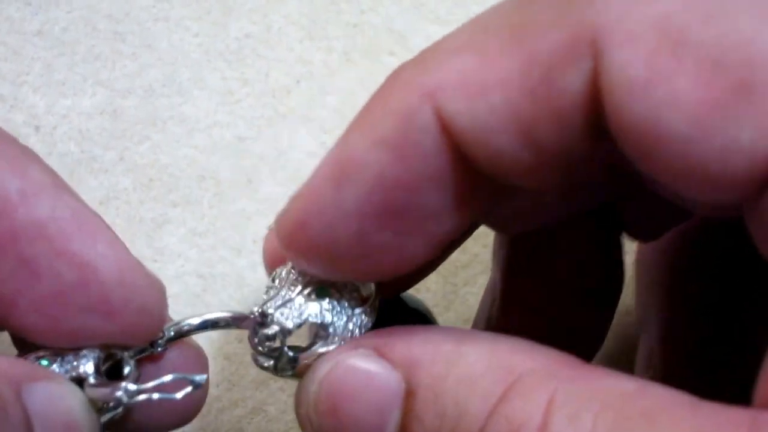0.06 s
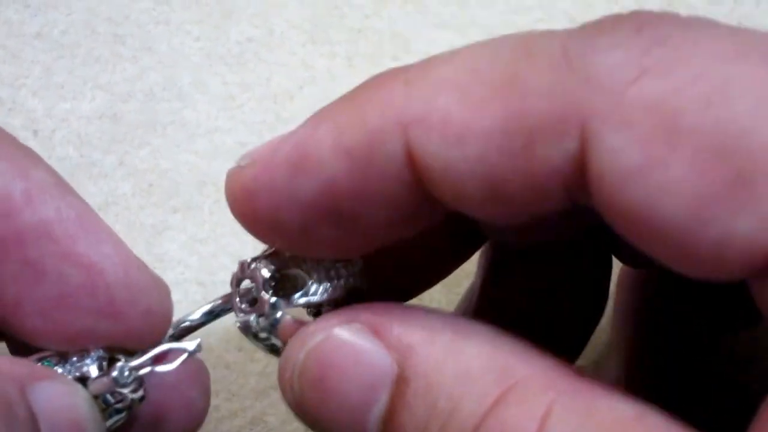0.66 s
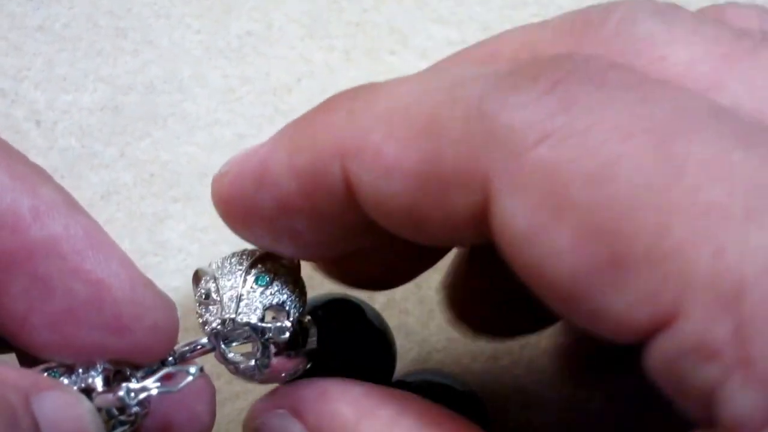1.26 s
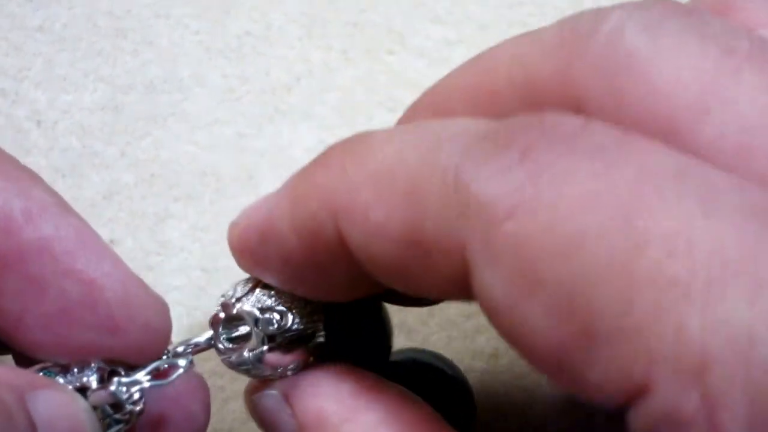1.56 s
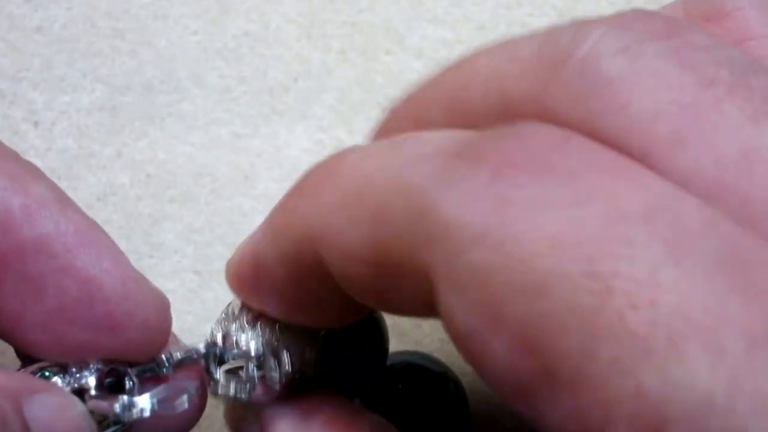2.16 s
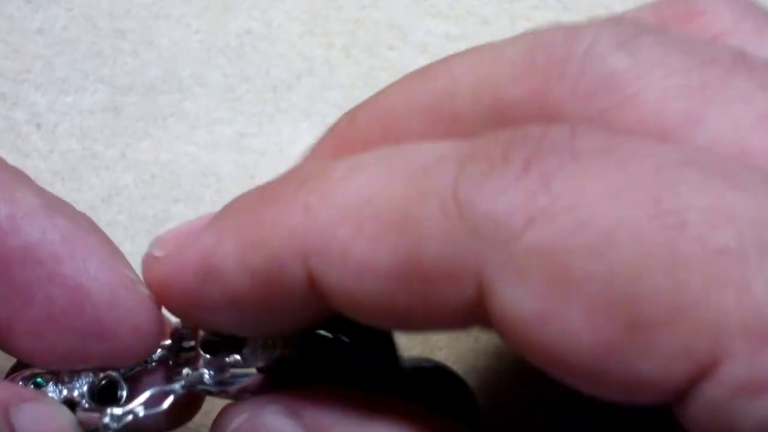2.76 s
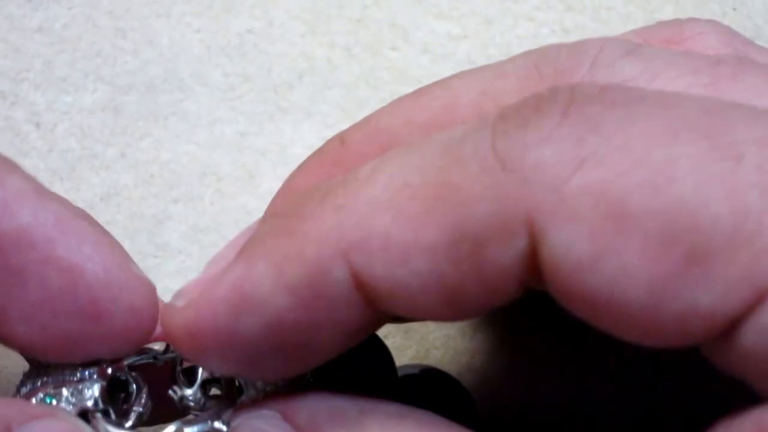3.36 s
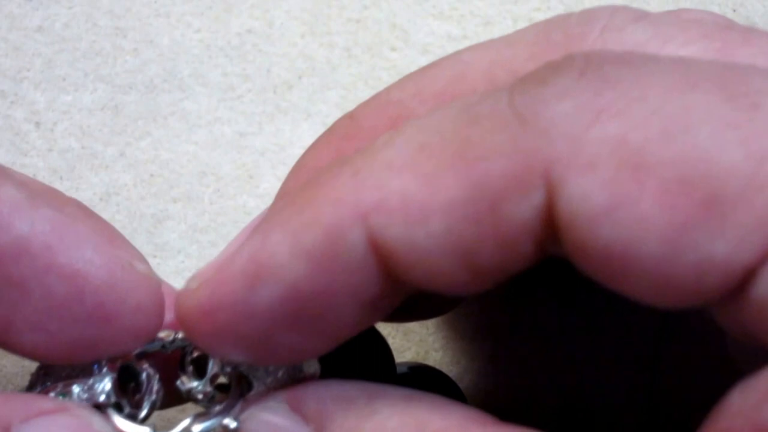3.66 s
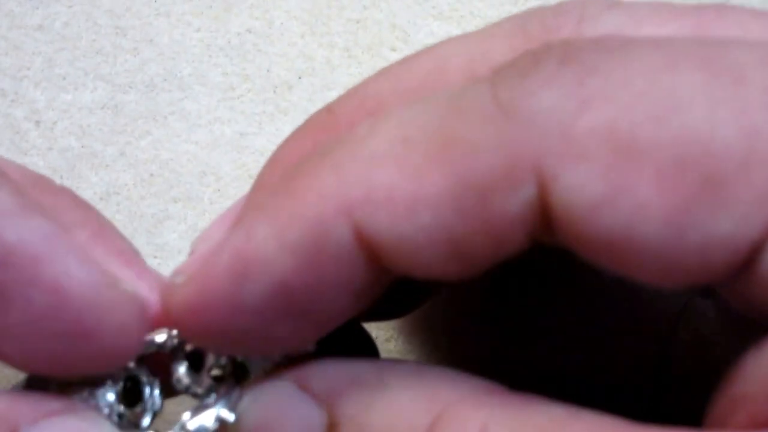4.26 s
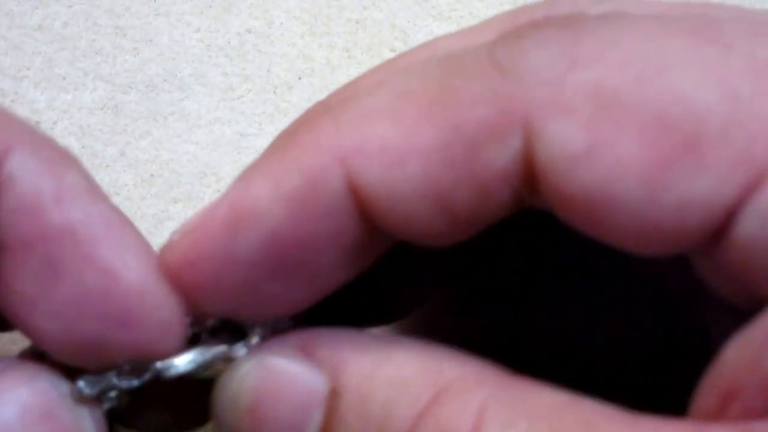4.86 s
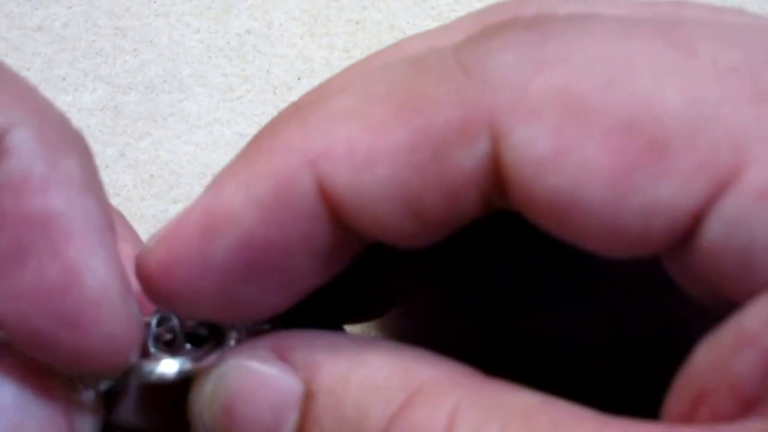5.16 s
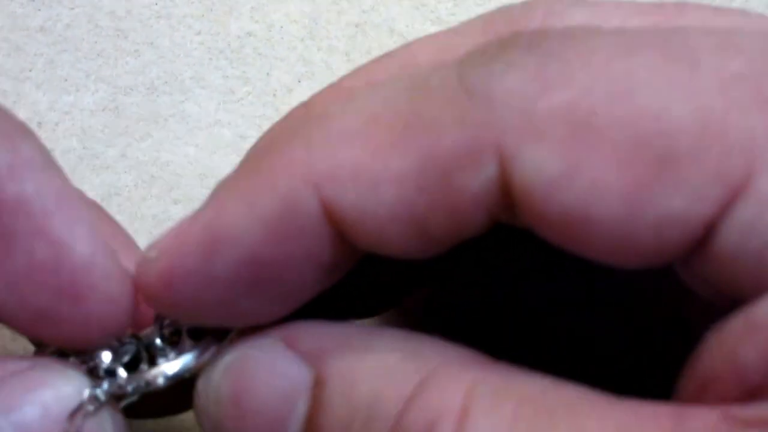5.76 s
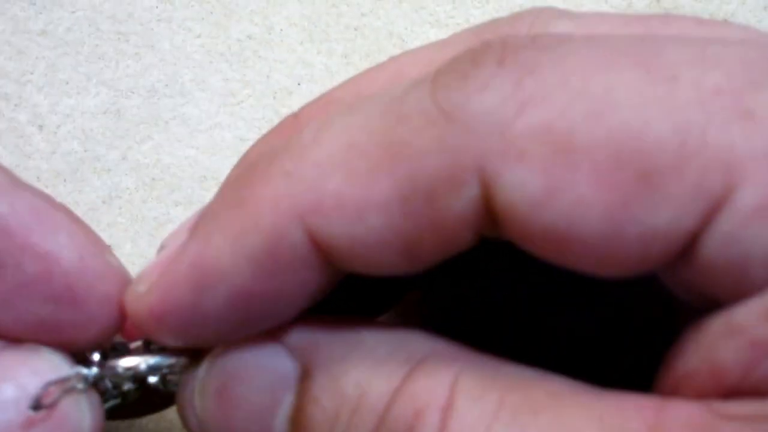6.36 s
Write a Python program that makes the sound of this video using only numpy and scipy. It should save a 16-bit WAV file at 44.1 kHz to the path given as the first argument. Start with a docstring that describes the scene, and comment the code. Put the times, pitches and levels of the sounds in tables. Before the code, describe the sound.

Close, thin metallic ticks from a bead string's clasp being handled, with one sharp snap and quiet room hum behind.

```python
"""A small metal clasp on a string of beads ticks as fingers work it, close to a microphone.
Clasp, ring and links tap each other and ring briefly, and the spring catch snaps shut once.
Fingertips rub, metal scrapes and beads knock softly. Behind them are a quiet, droning room and
faint electrical whines. The loud snap makes an automatic gain control turn everything down briefly."""
import sys
import numpy as np
from scipy import signal
from scipy.fft import rfft, irfft
from scipy.io import wavfile
from scipy.ndimage import uniform_filter1d

SR = 44100
rng = np.random.default_rng(int(sys.argv[2]) if len(sys.argv) > 2 else 0)


def to_wav(s):
    """Save 16-bit WAV."""
    ch = np.atleast_2d(s).T  # columns
    pcm = np.round(np.clip(ch, -1, 1) * 32767)  # PCM
    wavfile.write(sys.argv[1], SR, pcm.astype(np.int16))


N = 282240
TAPS = 2048  # samples used to build one short sound
HZ = np.fft.rfftfreq(TAPS, 1 / SR)  # the frequencies in its spectrum


def ticks(touches=3):
    """Metal parts tap each other once, or land and bounce, weaker with each touch."""
    # single taps: start_s, level_db, ring_hz, second_ring_hz, body_db, brightness_db
    single_taps = [(0.6064, -23.5, 10200, 13000, 6, -12), (0.8072, -37, 9400, 12500, 0, -9),
                   (0.8909, -13, 9650, 10200, -29, 1), (0.9371, -29, 9600, 10800, -4, -10),
                   (0.9418, -18.5, 9850, 11200, -6, -13), (0.9635, -34, 10070, 11400, 5, -4),
                   (1.1454, -20, 9900, 11900, 3, -7), (1.2404, -28, 9700, 12200, 9, -9),
                   (1.2426, -23, 9800, 9100, 7, -11), (1.4446, -17, 8750, 10500, -5, 3),
                   (1.5775, -28.5, 8400, 9200, -7, -9), (2.1099, -31, 8680, 9600, -17, -12),
                   (2.2403, -37, 8300, 13300, 0, -4), (2.268, -24, 8100, 13100, 0, -8),
                   (2.497, -22, 8300, 9000, 5, -15), (2.5062, -27, 8200, 8700, -5, -12),
                   (2.594, -30.5, 8830, 10800, 2, -12), (2.7593, -23, 8900, 6300, 9, -12),
                   (2.7662, -30, 6400, 8600, 9, -18), (2.783, -28.5, 8060, 8600, 6, -4),
                   (3.362, -33.5, 8700, 10800, 15, -12), (3.4087, -36.5, 10200, 11200, -16, -14),
                   (4.418, -36, 8300, 10800, 1, -5), (4.5585, -35, 8000, 9300, 6, -11),
                   (4.8494, -33, 7300, 9900, 1, -12), (4.8727, -25, 12250, 7700, 3, -7),
                   (4.897, -22.5, 7550, 11300, -1, -11), (4.955, -23, 11250, 7800, 3, -7),
                   (4.9564, -17, 11250, 7750, 3, -8), (4.9593, -16, 11300, 7700, 3, -8),
                   (4.962, -25, 11250, 7800, 3, -8), (4.9795, -33, 11300, 7800, 7, -8),
                   (5.0208, -33, 7900, 9200, 0, -10), (5.0337, -37, 8200, 10300, 4, -4),
                   (5.061, -6.5, 7600, 8700, -3.5, -3), (5.21, -28, 8370, 14800, 6, -4),
                   (5.2184, -31, 8100, 12800, 2, -10), (5.2341, -37, 8100, 11200, 1, -8),
                   (5.269, -35.5, 8200, 11200, 1, -8), (5.9315, -17, 8300, 7400, 3, -15)]
    # bouncing links: the same six columns, then gap_s, loss_per_bounce_db
    bounces = [(0.0315, -27.5, 9600, 8300, 0, -6, .0029, 7.5), (2.2091, -26, 8250, 9900, 1, -11, .0033, 1),
               (2.4957, -16.5, 8300, 11600, 5, -15, 0.0048, 6.5),
               (4.93, -20, 7750, 11000, 1, -1, .0054, 5.5)]
    out = np.zeros(N)
    for row in single_taps:
        add(out, *contact(*row))
    for start_s, db, *part, gap_s, loss_db in bounces:
        for k in range(touches):
            add(out, *contact(start_s + k * gap_s, db - k * loss_db, *part))
    return out


def contact(start_s, db, ring_hz, second_hz, body_db, brightness_db, graze_s=0.00075, ripple_db=3.0):
    """One touch makes a metal part ring; returns its start time and its sound."""
    bands_hz = np.linspace(0, SR / 2, 30)
    # the spot that is hit favours some pitches over others
    ripple = ripple_db * np.interp(HZ, bands_hz, rng.standard_normal(len(bands_hz)))
    colour_db = metal_spectrum(ring_hz, second_hz, body_db, brightness_db) + ripple
    # a grazing touch smears the blow: each band is a fraction of a millisecond late
    lag_s = graze_s * np.interp(HZ, bands_hz, rng.random(len(bands_hz)))
    smear = np.exp(-2j * np.pi * np.cumsum(lag_s) * SR / TAPS)
    sound = irfft(rfft(struck(db + colour_db)) * smear)
    return start_s - graze_s / 2, sound[:TAPS // 2]


def metal_spectrum(ring_hz, second_hz, body_db, brightness_db):
    """The tone of one small metal part, in dB: two ringing pitches stand out from the rest."""
    # tone shared by all the small parts: pitch_hz, level_db
    metal = [(200, -36), (1000, -21), (3500, -20.5), (4900, -14.5), (5900, -13), (6500, -5), (7100, -3.5),
             (7700, -3), (10500, -1), (13000, 4.5), (15600, -1), (17000, -5)]
    lows_db = body_db * read([(5800, 1), (7600, 0.21)], HZ)
    highs_db = brightness_db * read([(10500, 0), (13000, 0.76)], HZ)
    ring_db = 12 - 0.44 * body_db  # a part held against the fingers has more body and rings less
    ring = resonance(HZ, ring_hz, half_width_hz=510, db=ring_db)
    second = resonance(HZ, second_hz, half_width_hz=440, db=8)
    return read(metal, HZ) + lows_db + highs_db + 10 * np.log10(1 + ring ** 2 + second ** 2)


def snap(start_s=1.8803, boost_db=9):
    """The spring catch drops shut in one hard blow that rings the whole clasp."""
    # tone of the clasp's body: pitch_hz, level_db
    clasp = [(300, -37), (1000, -29), (1500, -14.5), (2100, -22), (2600, -24), (3200, -32), (3800, -24),
             (4400, -17.5), (5400, -10), (6450, -2), (7100, -5.5), (7700, -1.5), (9000, 0.5), (10500, -11),
             (11800, -3), (13200, -4), (15500, -7), (17000, -5)]
    out = np.zeros(N)
    add(out, start_s, struck(boost_db + read(clasp, HZ)))
    return out


def struck(spectrum_db):
    """The ring of an object with this spectrum after one sharp blow."""
    log_gain = np.log(amp(np.r_[spectrum_db, spectrum_db[-2:0:-1]]))
    spectrum = np.exp(np.conj(signal.hilbert(log_gain)))  # minimum phase: no sound before the blow
    return irfft(spectrum[:len(spectrum_db)])


def knocks(attack_s=0.00023):
    """A nudged bead gives one lower ring that the fingers stop at once."""
    # bead knocks: start_s, level_db, pitch_hz, fade_s (time to fall by 60 dB)
    beads = [(0.695, -42, 3000, .004), (2.2505, -38, 2700, 0.0067), (2.256, -48, 4320, .005),
             (2.4956, -39, 2880, .004), (2.497, -40, 4600, .005), (5.0616, -41, 2800, 0.0018),
             (5.0614, -43, 4750, 0.0018)]
    out, t = np.zeros(N), np.arange(TAPS * 2) / SR
    for start_s, db, hz, fade_s in beads:
        envelope = (1 - np.exp(-t / attack_s)) * np.exp(-np.log(1000) * t / fade_s)
        add(out, start_s, amp(db) * envelope * np.sin(2 * np.pi * hz * t))
    return out


def rubs():
    """Sliding skin makes a soft hiss; metal dragged over metal rings as it goes."""
    # fingertips on beads: middle_s, half_length_s, level_db, centre_hz, width_octaves
    slides = [(0.5, .011, -54, 1180, .3), (0.942, .03, -62, 5500, 0.93), (2.255, 0.012, -59.5, 3100, 0.73),
              (2.555, .03, -63, 4300, 1), (2.919, 0.084, -68, 5960, .83), (3.956, 0.036, -64, 5500, 0.85),
              (4.68, .043, -58.5, 13000, 0.18), (4.957, 0.023, -58.5, 6500, 1)]
    # metal on metal: middle_s, half_length_s, level_db, ring_hz, second_ring_hz, body_db
    scrapes = [(0.043, .03, -68, 9200, 11000, 16), (0.933, 0.021, -73, 9900, 11200, -4),
               (1.565, .055, -69, 9000, 11500, 20), (2.64, .026, -66, 11000, 13000, 14),
               (4.681, 0.055, -61.5, 9300, 13500, 14), (4.951, 0.0072, -53, 11300, 7800, 2),
               (5.0595, 0.001, -39, 11400, 7900, 2)]
    out = np.zeros(N)
    for middle_s, half_s, db, centre_hz, octaves in slides:
        band = np.exp(-(np.log2((HZ + 1) / centre_hz) / octaves) ** 2 / 2)
        add(out, *friction(middle_s, half_s, db, band))
    for middle_s, half_s, db, *part in scrapes:
        colour = amp(metal_spectrum(*part, brightness_db=-19))
        add(out, *friction(middle_s, half_s, db, colour))
    return out


def friction(middle_s, half_s, db, colour, grain_db=2):
    """A dense run of tiny, uneven slips swells and fades; returns its start time and its sound."""
    size = SR // 2
    t, hz = (np.arange(size) - size // 2) / SR, np.fft.rfftfreq(size, 1 / SR)
    slips = rng.standard_normal(size) * amp(grain_db * np.minimum(rng.exponential(size=size), 5))
    rub = irfft(rfft(slips) * np.interp(hz, HZ, colour), size)
    envelope = np.exp(-(t / half_s) ** 2 / 2)
    sound = amp(db) * rub / rub.std() * envelope
    return middle_s + t[0], sound[middle_s + t >= 0]


def stirring(touches_per_s=16, db=-39, pitch_spread=0.11):
    """The links touch faintly, at random, while they are handled."""
    # times when the links stir: start_s, end_s
    handling = [(0.74, 0.83), (4.78, 4.9)]
    out = np.zeros(N)
    for start_s, end_s in handling:
        length_s = end_s - start_s
        for when, pitch in rng.random((round(touches_per_s * length_s), 2)):
            touch_s = start_s + when * length_s
            ring_hz = 8150 * (1 + pitch_spread * (2 * pitch - 1))
            add(out, *contact(touch_s, db, ring_hz, second_hz=11000, body_db=3, brightness_db=-9))
    return out


def room(sound, tail_gain_db=-2.5, dull_hz=10500, build_s=0.009):
    """The room adds a few quick echoes and a short tail that differs between left and right."""
    # echoes from table top, hands and walls: delay_s, level_db, smear_s
    echoes = [(.0005, -9, .0005), (.0013, -11.5, 0.004), (.0078, -19, .002), (0.017, -21, .002)]
    # the room's fading tail: pitch_hz, fade_s (time to fall by 60 dB), level_db
    tail_bands = [(500, 0.4, -19), (4700, 0.46, -5), (6150, 0.37, -9), (7700, 0.28, -7.5),
                  (10050, 0.18, -10), (12900, 0.21, -11), (16000, .17, -21)]
    size = SR // 2
    early = np.zeros(size)
    for delay_s, db, smear_s in echoes:
        # cluttered surfaces scatter each echo a little and dull it
        taper = np.maximum(1 - np.arange(TAPS) / (smear_s * SR), 0)
        scatter = rng.standard_normal(TAPS) * taper
        add(early, delay_s, amp(db) * scatter / np.linalg.norm(scatter))
    early = signal.lfilter(*signal.butter(2, dull_hz, fs=SR), early)
    early[0] = 1  # the direct sound
    hz, t, noise = signal.stft(rng.standard_normal((2, size)), SR, nperseg=256)
    decay_rate = np.log(1000) / read(tail_bands, hz)[:, None]
    strength = amp(read(tail_bands, hz, column=2))[:, None] * np.sqrt(2 * decay_rate / SR)
    envelope = np.exp(-decay_rate * t) * (1 - np.exp(-t / build_s))
    tail = signal.istft(noise * strength * envelope, SR)[1][:, :size]
    return signal.fftconvolve(sound[None], early + amp(tail_gain_db) * tail, axes=1)[:, :N]


def room_noise(swell_db=0.43, bass_pan_db=0.96):
    """Soft air noise and a low drone held in a few of the room's resonances."""
    # air noise that is the same left and right: pitch_hz, level_db (per Hz)
    air_shared = [(25, -99), (42, -89.5), (56, -75.5), (78, -71.5), (105, -76), (160, -73), (400, -73.5),
                  (560, -81.5), (800, -81.5), (1000, -87.5), (1900, -92.5), (3400, -104), (10500, -106),
                  (15500, -111.5)]
    # faint hiss with opposite signs left and right: pitch_hz, level_db (per Hz)
    hiss_opposed = [(25, -86), (55, -72), (100, -67.5), (190, -66.5), (280, -68.5), (400, -70.5),
                    (800, -75.5), (1500, -82.5), (2200, -90), (3500, -105.7), (7000, -111.7),
                    (11500, -108.5), (15500, -112.5)]
    # narrow bands of the drone: pitch_hz, half_width_hz, level_db (per Hz)
    drone_bands = [(176.5, 10.7, -63.5), (197.5, 9.5, -65), (238.6, 10, -67.5), (303, 8, -79),
                   (371, 28, -68), (470.3, 43, -78.5), (695, 13, -81), (1219, 14, -86.5)]
    # slow rise and fall of the bass: time_s, gain_db
    bass_curve = [(0, 0), (1.1, -1), (1.55, 0.5), (2.2, -.5), (2.8, 0), (3.15, -1.5), (3.9, -1), (4.2, 1.5),
                  (4.55, -2), (4.95, 0), (5.7, 0), (6.4, 1)]
    hz = np.fft.rfftfreq(N, 1 / SR)
    shared = hiss(amp(read(air_shared, hz)))
    opposed = hiss(amp(read(hiss_opposed, hz)))
    drone_power = sum(resonance(hz, *band) ** 2 for band in drone_bands)
    drone = hiss(np.sqrt(drone_power))
    both = np.array([shared + drone + opposed, shared + drone - opposed])
    bass = signal.sosfiltfilt(signal.butter(2, 500, fs=SR, output="sos"), both)
    bass_db = np.interp(np.arange(N) / SR, *np.transpose(bass_curve)) + swell_db * swell()
    bass_gain = amp([bass_db + bass_pan_db, bass_db - bass_pan_db])
    return both + bass * (bass_gain - 1)


def swell(slow_hz=0.627, fast_hz=5, count=12):
    """Slow waves add up to a random rise and fall with a typical size of 1."""
    return sum(sine(hz) for hz in np.geomspace(slow_hz, fast_hz, count)) / np.sqrt(count)


def whines():
    """Thin, steady tones from the electronics, the same left and right."""
    # electrical tones: pitch_hz, level_db
    tones = [(4096, -84.5), (10740, -88), (13415, -85)]
    return sum(amp(db) * sine(hz) for hz, db in tones)


def sine(hz):
    """A pure wave with an average power of 1, starting at a random point in its cycle."""
    t = np.arange(N) / SR
    return np.sqrt(2) * np.sin(2 * np.pi * (hz * t + rng.random()))


def hiss(gain):
    """Noise shaped by one gain for each frequency; gain squared is the power per Hz."""
    return irfft(rfft(rng.standard_normal(N)) * gain * np.sqrt(SR / 2), N)


def resonance(hz, centre_hz, half_width_hz, db):
    """A gain curve that peaks at the pitch where something likes to ring."""
    return amp(db) / (1 + ((hz - centre_hz) / half_width_hz) ** 2)


def amp(db):
    """Turns decibels into a gain to multiply by."""
    return 10 ** (np.asarray(db) / 20)


def read(points, hz, column=1):
    """Looks up a table column, joining its points with straight lines over log frequency."""
    table = np.transpose(points)
    return np.interp(np.log(hz + 1), np.log(table[0] + 1), table[column])


def add(mix, start_s, sound):
    """Mixes a sound in at its start time."""
    part = mix[max(round(start_s * SR), 0):][:len(sound)]
    part += sound[:len(part)]


def scene(pan_db=0.6, right_lag_s=4e-6):
    """The clasp sits just left of centre, so the right side hears it a little softer and later."""
    background = room_noise() + whines()
    handling = ticks() + knocks() + rubs() + stirring()
    left, right = room(handling) + room(snap())
    delay = np.exp(-2j * np.pi * np.fft.rfftfreq(N, 1 / SR) * right_lag_s)
    right = irfft(rfft(right) * delay, N)
    return np.array([left * amp(pan_db), right * amp(-pan_db)]) + background


def record(dry, threshold_db=-23.5, slope=0.61, recover_db_per_s=5.0, attack_s=0.015, cutoff_hz=16050):
    """Gain control dips quickly after a loud peak and creeps back; a filter cuts the highest treble."""
    power = uniform_filter1d((dry ** 2).mean(0), size=128)
    power_db = 10 * np.log10(abs(power) + 1e-12)
    wanted_dip_db = slope * np.maximum(power_db - threshold_db, 0)
    recovery_db = np.arange(N) * recover_db_per_s / SR
    held_dip_db = np.maximum.accumulate(wanted_dip_db + recovery_db) - recovery_db
    smoothing = np.exp(-1 / (attack_s * SR))
    dip_db = signal.lfilter([1 - smoothing], [1, -smoothing], held_dip_db)
    lowpass = signal.firwin(255, cutoff_hz, window=("kaiser", 8), fs=SR)
    return signal.oaconvolve(dry / amp(dip_db), lowpass[None], "same")


dry = scene()
out = record(dry)
to_wav(out)
```